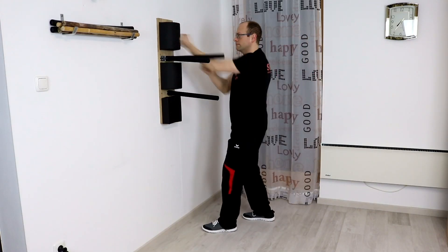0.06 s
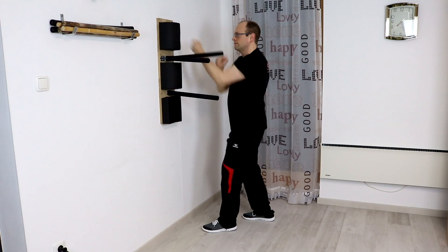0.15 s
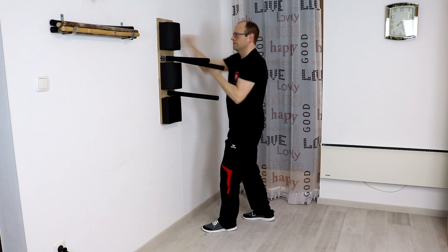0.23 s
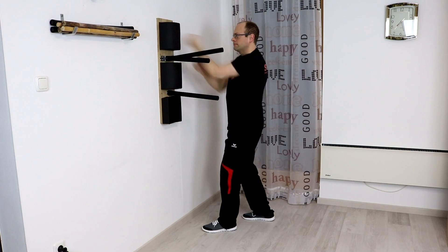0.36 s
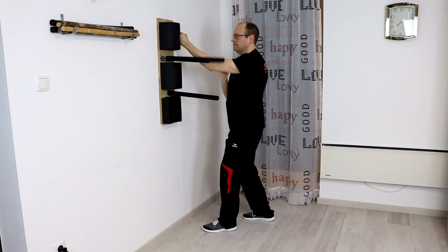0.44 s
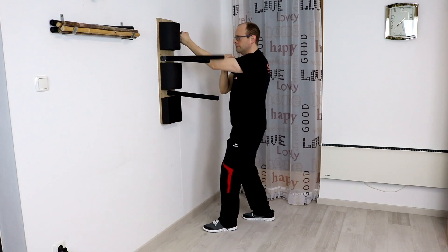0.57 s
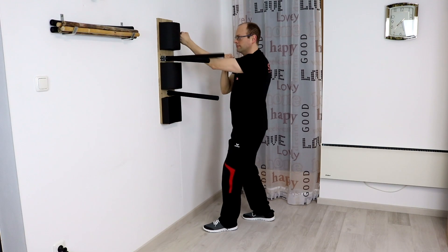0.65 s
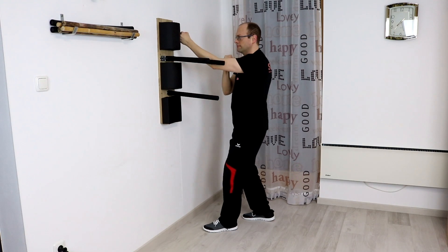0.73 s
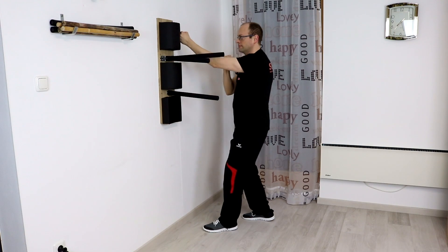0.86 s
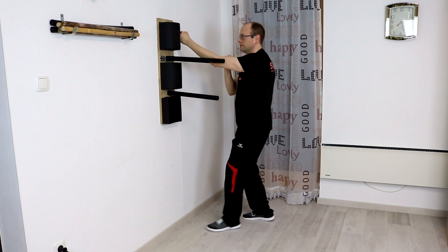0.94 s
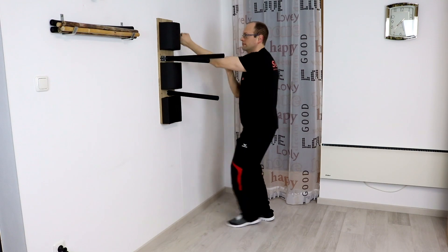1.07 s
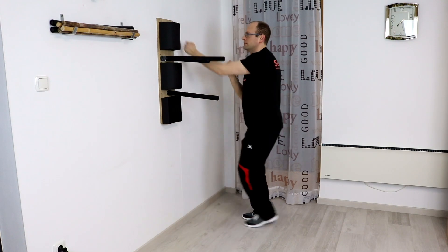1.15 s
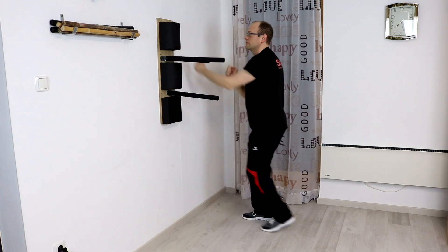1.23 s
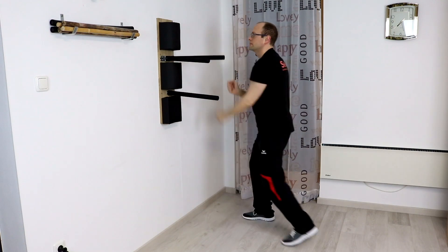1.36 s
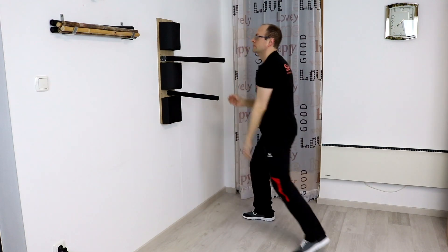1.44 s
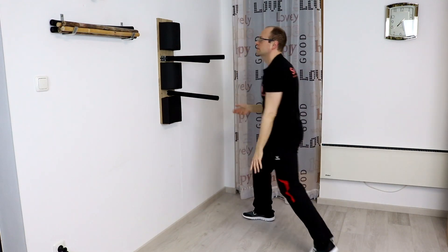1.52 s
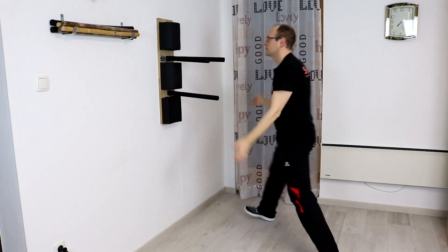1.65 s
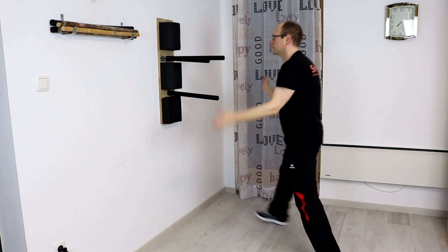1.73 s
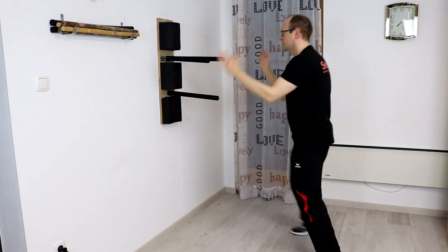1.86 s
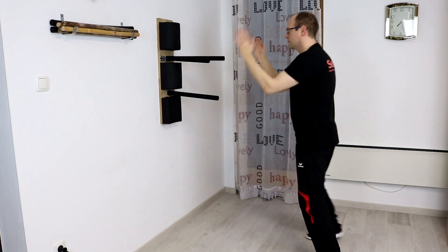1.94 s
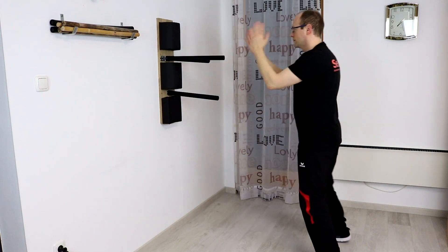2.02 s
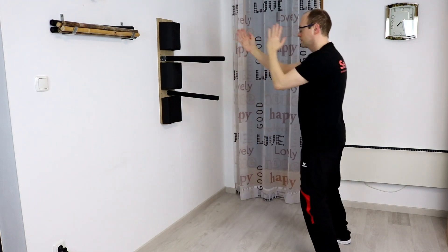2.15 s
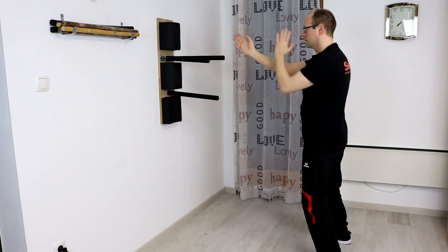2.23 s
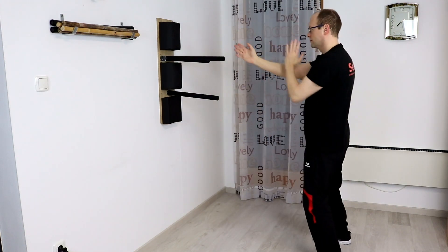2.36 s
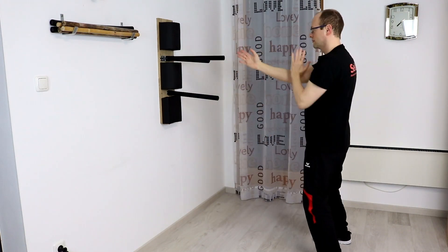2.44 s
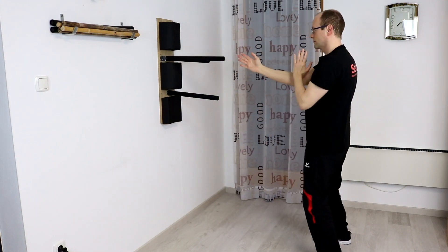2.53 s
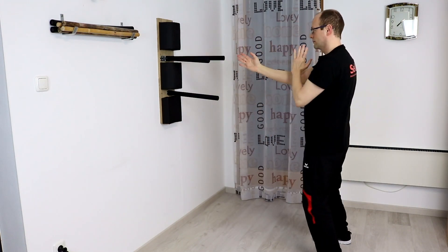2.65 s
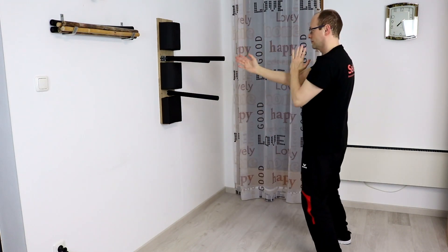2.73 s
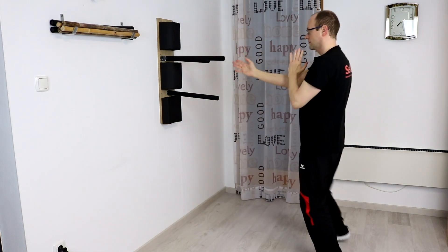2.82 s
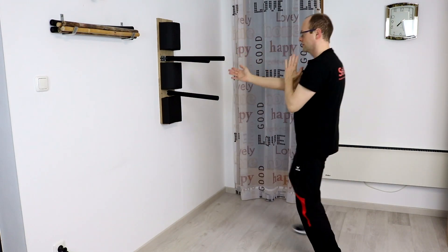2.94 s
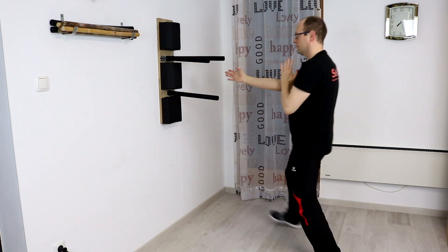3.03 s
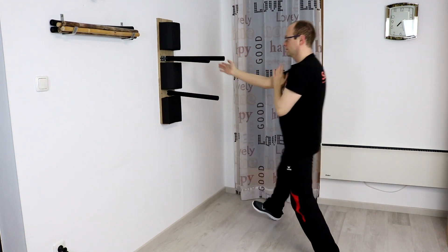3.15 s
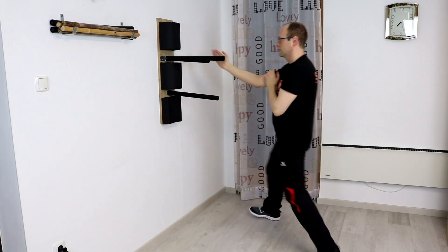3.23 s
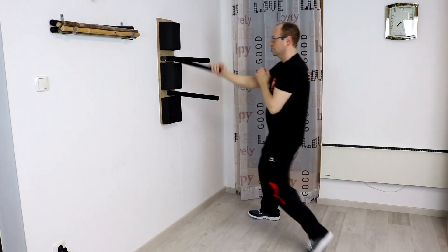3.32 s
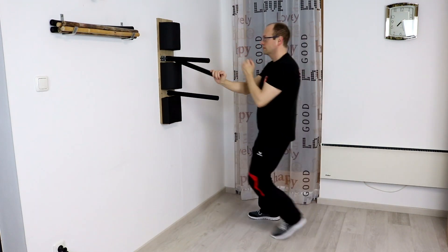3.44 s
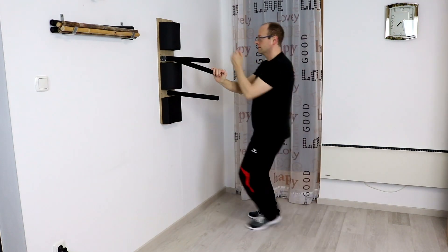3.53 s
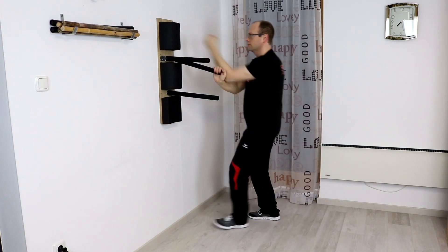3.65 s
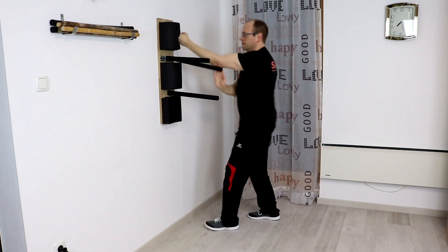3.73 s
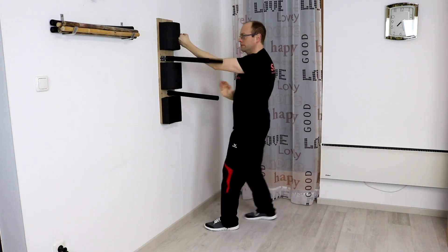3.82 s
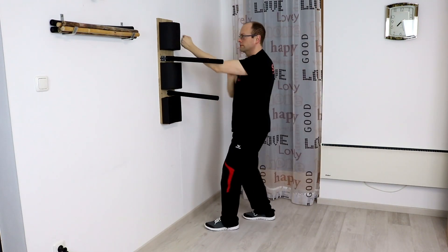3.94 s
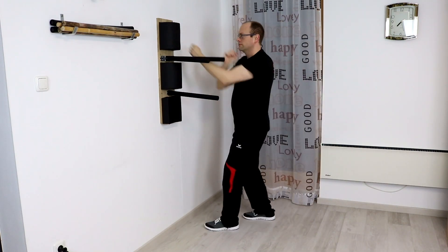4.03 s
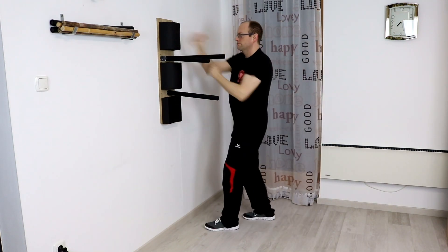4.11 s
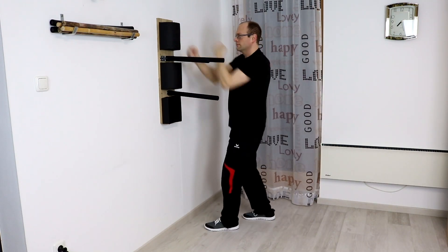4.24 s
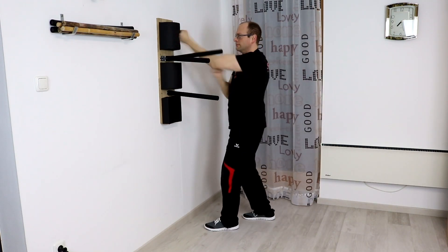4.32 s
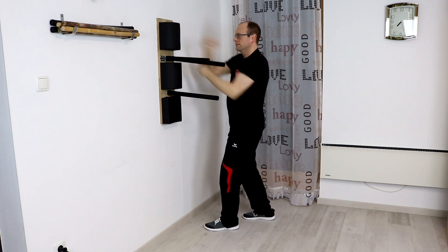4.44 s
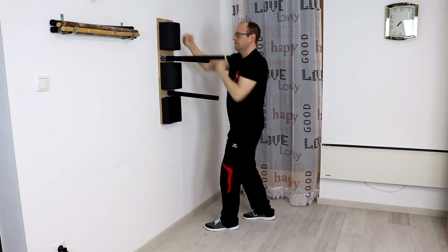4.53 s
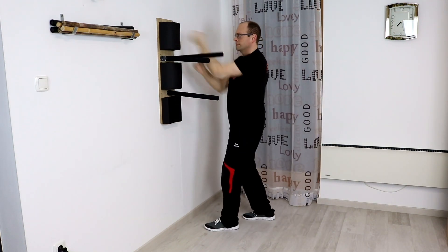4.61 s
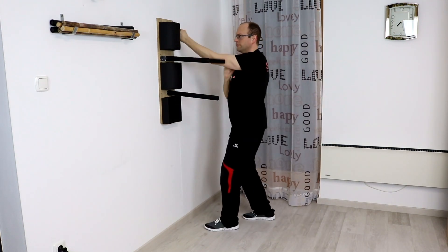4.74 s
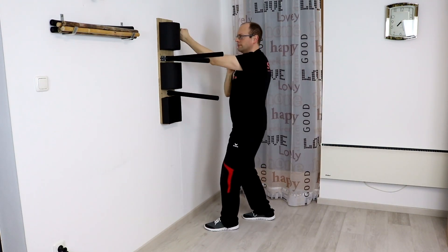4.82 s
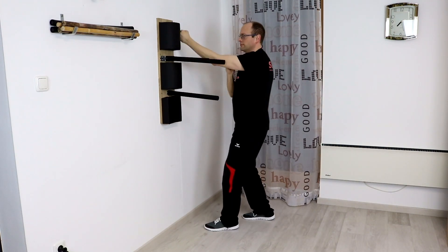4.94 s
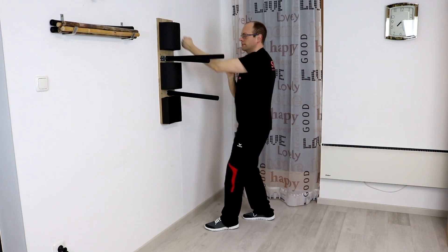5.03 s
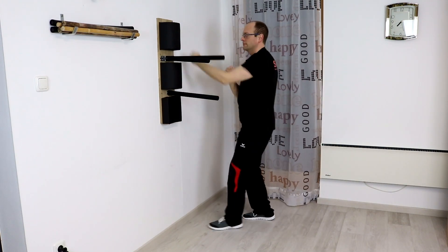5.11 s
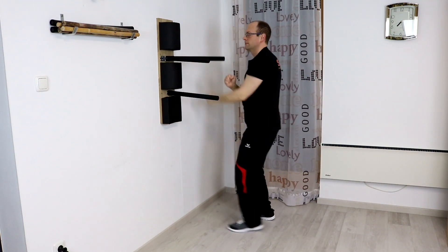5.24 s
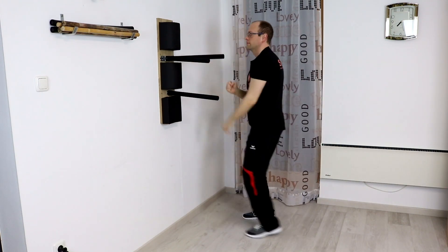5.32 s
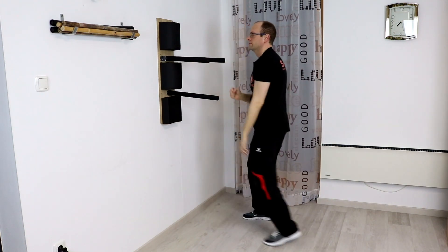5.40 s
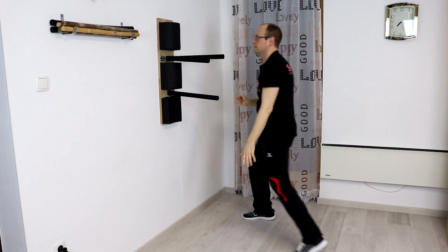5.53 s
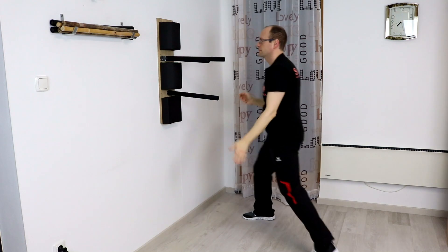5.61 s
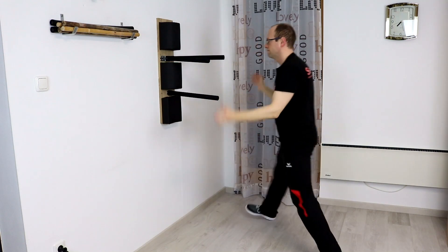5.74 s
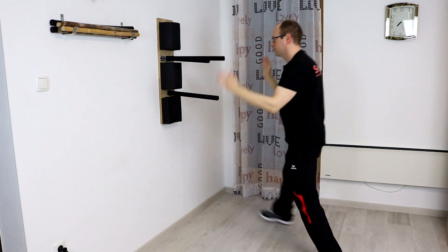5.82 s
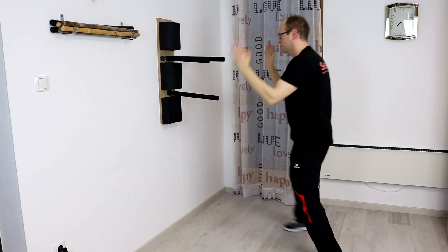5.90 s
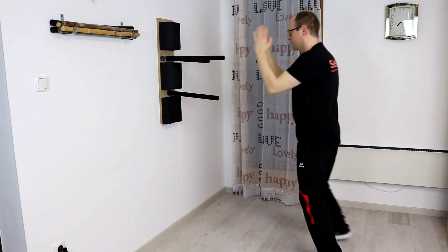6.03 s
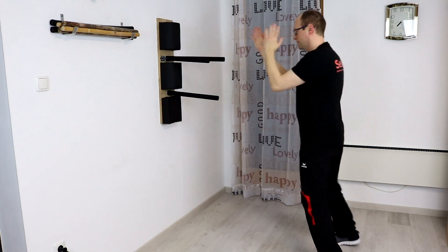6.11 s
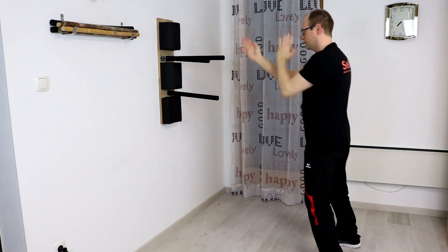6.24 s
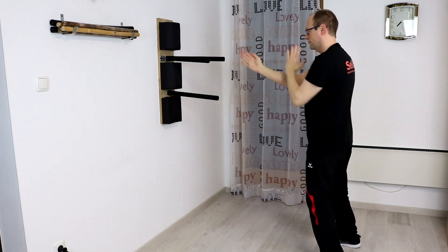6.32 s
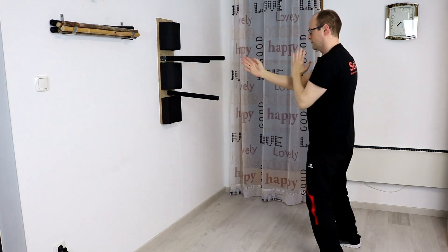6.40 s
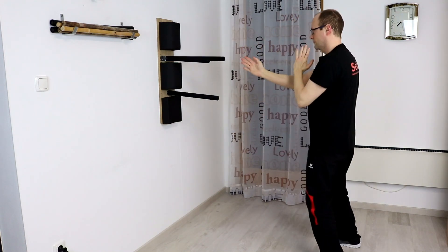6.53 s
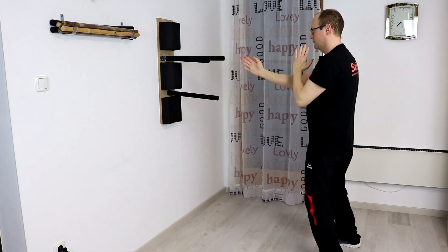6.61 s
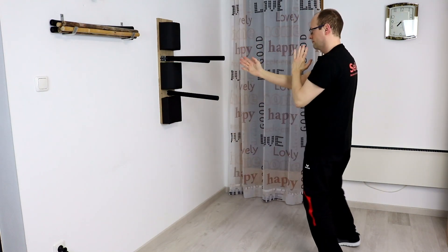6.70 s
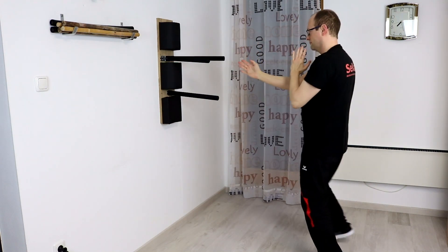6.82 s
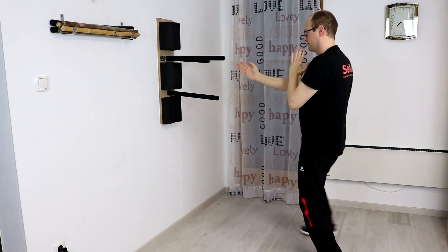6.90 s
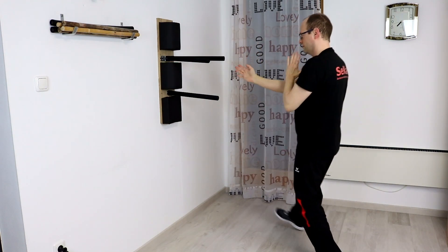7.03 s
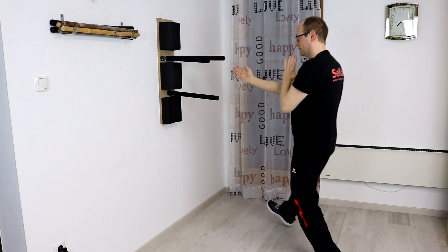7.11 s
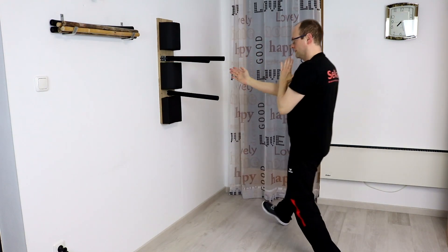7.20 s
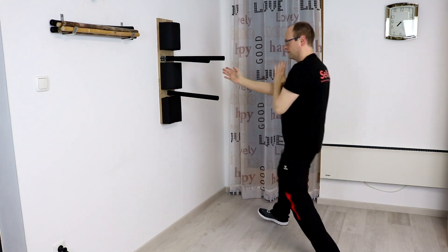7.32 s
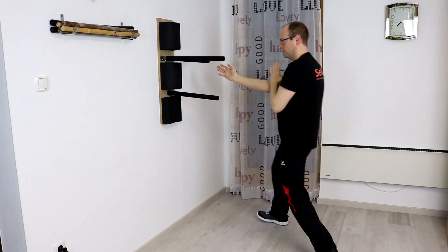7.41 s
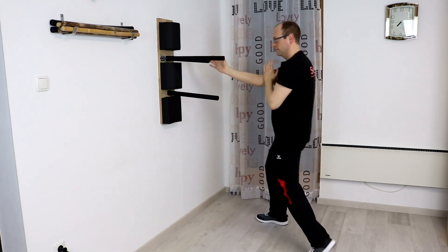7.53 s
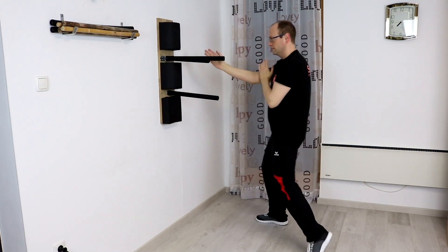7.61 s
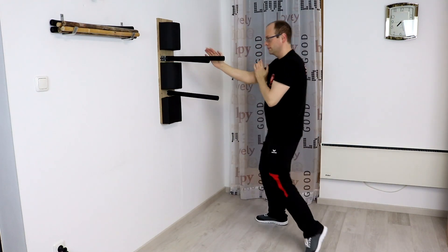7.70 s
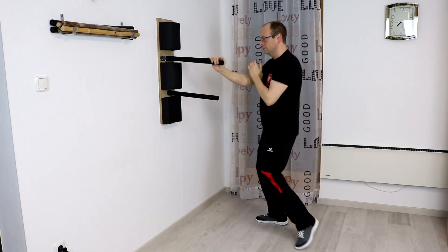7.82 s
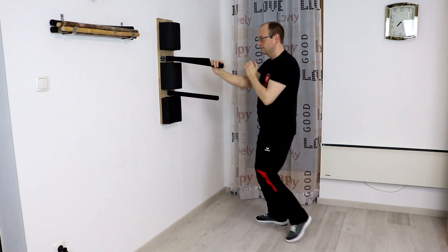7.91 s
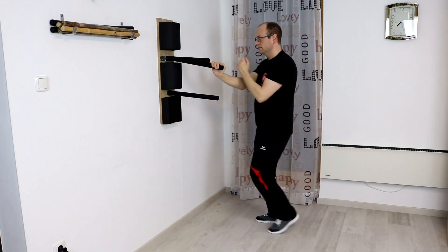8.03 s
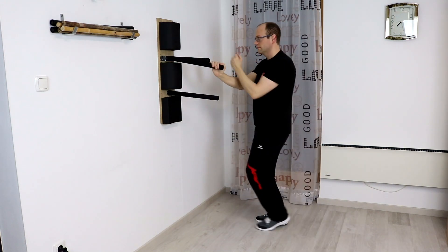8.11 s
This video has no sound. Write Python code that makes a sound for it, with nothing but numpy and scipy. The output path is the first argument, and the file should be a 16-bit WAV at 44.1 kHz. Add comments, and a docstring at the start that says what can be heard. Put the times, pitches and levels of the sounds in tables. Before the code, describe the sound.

Two quick runs of hard fist punches thud and slap on a wall-mounted pad in a boomy bare room, with shoe shuffles, cloth swishes and a hand smack between.

```python
"""Punches on a padded dummy

Runs of punches on a wall-mounted padded training dummy in a small, bare room with a laminate floor.
Each fist is a noise slap on the vinyl over damped ringing of pad and board; decaying noise and sines boom after it.
Shoes tap, slide and squeak, clothes swish, and a hand smacks and rubs the dummy's arm: filtered noise and a chirp.
A mono camera microphone overloads on the hardest blows, over a quiet noise tone; both channels are the same."""
import sys
import numpy as np
from scipy import signal
from scipy.fft import rfft, irfft, next_fast_len
from scipy.io import wavfile
from scipy.ndimage import uniform_filter1d

SR = 44100
rng = np.random.default_rng(int(sys.argv[2]) if len(sys.argv) > 2 else 0)


def wrap_up_sound(samples):
    """Save the sound to the file named by the first command line argument, as 16-bit audio."""
    columns = np.atleast_2d(samples).T
    # keep every value between -1 and 1, then stretch to whole-number steps
    tamed = np.clip(columns, -1, 1)
    steps = np.round(tamed * 32767).astype(np.int16)
    wavfile.write(sys.argv[1], SR, steps)


N = 359856
LEAD = SR // 4  # samples before the start, whose sound rings on into it
TIME = np.arange(-LEAD, N) / SR  # scene clock [s]
AGE = np.arange(SR // 5) / SR  # time since a contact began [s]


# punches on the pad: (time [s], pad level [dB], board level [dB], slap level [dB], slap decay [s],
# cover crinkle level [dB], tuning [ratio], room level [dB])
PUNCHES = [(-.06, -1.5, -9, -5.5, 0.003, -11, 1.12, 0.5), (.094, -6.5, -13, -16.5, 0.024, -25.5, 0.82, -1),
           (0.2713, -13.5, -4.5, -4.5, 0.0019, -19.5, 0.99, 2),
           (0.4018, -5, -11.5, -11.5, 0.012, -18.5, 0.78, 1),
           (3.7286, -3.5, -8.5, -5, 0.0042, -44.5, 0.943, 1),
           (4.1593, -6.5, -11, -4.5, 0.0045, -16, 0.97, 3.5), (4.327, -2, -8, -7, 0.0044, -37, 1, 0.5),
           (4.5083, -7, -3.5, -5, 0.0036, -26, 0.966, -0.5), (4.6613, -5, -11, -16, 0.02, -19.5, 0.91, 0)]
# damped modes of the foam pad: (frequency [Hz], level [dB], t60 [s])
PAD_MODES = [(189.3, -4.5, 0.04), (265, -3, 0.034), (432, -4.5, 0.046)]
# damped modes of the backing board: (frequency [Hz], level [dB], t60 [s])
BACKBOARD_MODES = [(405, -2, 0.025), (492, 2, 0.026), (684, -8.5, 0.019), (870, -19.5, 0.0095),
                   (1278, -8, 0.027), (1610, -24.5, 0.014)]
# spectrum of skin on vinyl: (frequency [Hz], level [dB])
SLAP_SPECTRUM = [(50, -42), (200, -6.5), (600, 12), (1500, 2.5), (3000, -0.5), (4500, 0.5), (8000, 1.5),
                 (11000, -8.5), (16000, -19)]


def punches(bottoming_s=0.00399, rebound_s=0.0102, rebound_db=-2, thump_room_db=-1.0, slap_room_db=2):
    """Knuckles slap the cover, vinyl crinkles as the fist sinks, foam bottoms out and the board knocks back."""
    out = np.zeros(len(TIME))
    click = unit(colour(signal.unit_impulse(len(AGE), idx=64), SLAP_SPECTRUM))
    for s, pad_db, board_db, slap_db, slap_decay, crinkle_db, tuning, room_db in PUNCHES:
        # the board hits the wall a second time, never quite alike
        rebound_tuning = tuning * (1 + 0.093 * rng.standard_normal())
        board = ring(BACKBOARD_MODES, tuning, bottoming_s)
        board = board + undb(rebound_db) * ring(BACKBOARD_MODES, rebound_tuning, rebound_s)
        thump = undb(pad_db) * ring(PAD_MODES, tuning, 0) + undb(board_db) * board

        skin = unit(colour(rng.standard_normal(len(AGE)), SLAP_SPECTRUM)) * np.exp(-AGE / slap_decay)
        # the crinkle swells and fades around 9 ms after contact
        sinking = np.exp(-((AGE - 0.009) / 0.0037) ** 2)
        crinkle = unit(resonate(rng.standard_normal(len(AGE)), 6600, 1600)) * sinking
        cover = undb(slap_db) * thin(skin, hz=132) + undb(crinkle_db) * crinkle

        # summed over all directions, the cover's sound reaches the walls as one smooth click
        spread = click * np.std(cover)
        to_room = undb(thump_room_db) * thump + undb(slap_room_db) * spread
        add(out, s, bounces(thump + cover))
        add(out, s, undb(room_db) * room(to_room))
    return out


def ring(modes, tuning, delay):
    """Damped modes of a struck part, starting after a delay, with the bass thinned."""
    t = np.maximum(AGE - delay, 0)
    modal_sum = sum(undb(db - 60 * t / t60) * np.sin(2 * np.pi * hz * tuning * t) for hz, db, t60 in modes)
    return thin(modal_sum, hz=146, order=5)


def thin(x, hz, order=3):
    """A small surface radiates little bass: a high-pass filter."""
    return signal.sosfilt(signal.butter(order, hz, "high", fs=SR, output="sos"), x)


CATCH_S = 3.2988


def catch(snap_db=-9, snap_hz=6500, width_hz=2800, decay=0.0029, knock_db=-22, room_db=-1):
    """An open hand smacks an arm of the dummy: a bright snap over a dull knock."""
    out = np.zeros(len(TIME))
    snap = undb(snap_db) * resonate(burst(snap_hz, width_hz, decay), snap_hz, 2 * width_hz)
    knock = undb(knock_db) * burst(1070, 2100, 0.018)
    # the room hears the snap as one smooth click of equal strength
    click = resonate(signal.unit_impulse(len(AGE)), snap_hz, width_hz)
    click = resonate(click, snap_hz, 2 * width_hz)
    to_room = unit(click) * np.std(snap) + knock
    add(out, CATCH_S, bounces(snap + knock))
    add(out, CATCH_S, undb(room_db) * room(to_room, standing_db=-71))
    return out


# shoes landing on the floor: (time [s], tap level [dB], centre [Hz], width [Hz], decay [s], floor thud level [dB])
STEPS = [(1.667, -27.5, 2850, 8400, 0.04, -60), (1.679, -22.5, 1710, 1580, .019, -59),
         (1.791, -27, 930, 900, 0.015, -57), (1.814, -16.5, 660, 300, 0.017, -42),
         (3.189, -19, 603, 380, 0.012, -40), (3.469, -25.5, 1680, 700, 0.014, -57),
         (3.498, -23, 1660, 800, 0.023, -73), (3.576, -24.5, 600, 350, .008, -50),
         (5.722, -24.5, 3900, 9150, 0.022, -58), (5.748, -20.5, 2060, 2090, 0.026, -60),
         (5.955, -25.5, 590, 341, 0.074, -46), (7.23, -28, 543, 500, 0.007, -47.5),
         (7.499, -42.5, 600, 400, 0.007, -70), (7.953, -35, 527, 250, 0.014, -64)]


def steps(thud_hz=115, thud_width_hz=90, thud_decay=0.029):
    """Heel or toe taps the laminate, with a soft thud of the floor beneath."""
    out = np.zeros(len(TIME))
    for s, tap_db, hz, width_hz, decay, thud_db in STEPS:
        tap = resonate(burst(hz, width_hz, decay), hz, 2 * width_hz)
        # the rubber sole rounds the attack
        tap = resonate(tap, hz, 3 * width_hz)
        thud = resonate(burst(thud_hz, thud_width_hz, thud_decay), thud_hz, thud_width_hz)
        add(out, s, undb(tap_db) * tap + undb(thud_db) * thud)
    return out


def burst(hz, width_hz, decay):
    """A short contact noise that dies away in one resonance."""
    noise = resonate(rng.standard_normal(len(AGE)), hz, width_hz)
    return unit(noise) * np.exp(-AGE / decay)


SQUEAK_S = 1.800


def squeak(db=-17, pitch_hz=985, half_s=0.0079, octave_db=-5.0, waver=0.037):
    """A rubber sole catches on the laminate: a brief chirp of wavering pitch with its octave."""
    phase = 2 * np.pi * np.cumsum(pitch_hz * (1 + waver * walk(400))) / SR
    swell = np.exp(-((TIME - SQUEAK_S) / half_s) ** 4)
    return undb(db) * swell * (np.sin(phase) + undb(octave_db) * np.sin(2 * phase))


PRESSURE_DB = 0.2  # wander of the foot's weight
SLIDE_RELEASE_S, SWISH_RELEASE_S = 0.025, 0.04
# shoes sliding over the floor: (time [s], speeding up [s], gliding [s], sole rubbing level [dB],
# grit scraping level [dB])
SLIDES = [(.92, 0.057, .06, -54, -36), (1.011, 0.063, 0.024, -32.5, -28.5), (1.26, 0.049, 0.026, -31, -44),
          (1.35, 0.015, 0.068, -30.5, -46.5), (1.49, 0.01, 0.008, -36, -45),
          (1.787, 0.0061, 0.035, -33, -29), (1.826, .018, 0.043, -46, -20),
          (1.88, 0.024, 0.059, -35.5, -29.5), (2.0, 0.019, 0.026, -54, -27.5),
          (2.77, 0.022, 0.052, -54, -57.5), (2.85, .045, 0.014, -49.5, -48),
          (2.95, 0.036, 0.39, -55.5, -52.5), (3.465, 0.023, 0.047, -34.5, -35),
          (5.1, 0.067, 0.096, -41.5, -36.5), (5.245, 0.037, 0.03, -28, -33),
          (5.31, 0.0093, 0.082, -23.5, -32), (5.405, .018, 0.013, -26, -43),
          (5.475, 0.028, 0.026, -29.5, -53), (5.57, 0.045, 0.064, -37, -47), (5.951, 0.034, 0.17, -33, -34),
          (6.107, 0.027, 0.0036, -31, -29), (6.68, 0.036, 0.23, -59.5, -55),
          (7.02, 0.037, 0.24, -55, -56.5), (7.279, 0.017, 0.2, -60, -51), (7.53, 0.025, 0.29, -77, -52),
          (7.79, .04, 0.096, -49, -65), (7.94, 0.018, 0.013, -50, -58)]
# floorboard resonances rubbed by the sole: (frequency [Hz], width [Hz], level [dB])
FLOORBOARDS = [(329.5, 38, -4), (596, 193, 3.5), (802, 377, 6), (1114, 295, 2), (1775, 550, -5.5)]
# spectrum of grit under the sole: (frequency [Hz], level [dB])
GRIT_SPECTRUM = [(200, -34), (450, -3.5), (1200, 2), (1900, 5), (3200, 5), (5000, 3), (9000, -9.5),
                 (16000, -39)]


def slides(rub_rough_db=2.5, grit_rough_db=2.0):
    """Soles drag over the boards, stirring their resonances, and grit scrapes under them."""
    rub = strokes([(s, rise, hold, db) for s, rise, hold, db, _ in SLIDES], SLIDE_RELEASE_S)
    scrape = strokes([(s, rise, hold, db) for s, rise, hold, _, db in SLIDES], SLIDE_RELEASE_S)

    # as the shoe travels, the same rubbing power favours now one resonance of the floor, now another
    shares = np.array([undb(db + 3.5 * walk(22)) for _, _, db in FLOORBOARDS])
    shares = shares / np.linalg.norm(shares, axis=0)
    slips = friction(rub_rough_db)
    sole = 0
    for share, (hz, width_hz, _) in zip(shares, FLOORBOARDS):
        board = resonate(resonate(slips, hz, width_hz), hz, 2 * width_hz)
        sole = sole + share * unit(board)

    grit = unit(colour(friction(grit_rough_db), GRIT_SPECTRUM))
    # the weight on the foot is never steady
    pressure = undb(PRESSURE_DB * walk(30))
    return pressure * (rub * sole + scrape * grit)


# trouser legs and sleeves swinging: (time [s], speeding up [s], gliding [s], level [dB])
SWISHES = [(.045, 0.017, .005, -31.5), (.51, 0.09, 0.023, -50), (0.898, 0.056, 0.081, -38),
           (1.02, 0.039, 0.21, -31), (1.305, 0.023, 0.07, -31), (1.468, 0.0083, 0.11, -35),
           (1.788, 0.029, 0.11, -26), (1.92, 0.039, 0.045, -28.5), (2.87, 0.041, .004, -43.5),
           (3.16, 0.1, 0.044, -40), (3.25, 0.079, .02, -35), (3.465, .035, 0.05, -37),
           (3.67, 0.033, .01, -43), (3.83, 0.031, 0.0093, -27.5), (3.99, 0.022, .005, -46),
           (4.11, 0.02, .005, -44.5), (4.695, 0.016, .005, -34), (5.059, 0.064, 0.16, -38),
           (5.304, 0.018, 0.13, -34), (5.42, 0.021, 0.22, -31.5), (5.951, 0.015, 0.15, -29),
           (6.8, 0.045, .003, -42), (7.02, 0.047, .02, -55), (7.28, 0.11, 0.027, -47.5),
           (7.53, 0.027, 0.2, -49)]
# spectrum of brushing cloth: (frequency [Hz], level [dB])
CLOTH_SPECTRUM = [(150, -27), (320, 0.5), (1000, 1.5), (2500, -2), (4500, 0), (8200, 1), (11000, -5),
                  (14000, -13.5), (16000, -18)]


def clothes(rough_db=0.92):
    """Cloth brushes on cloth with every swing of a leg or an arm."""
    return strokes(SWISHES, SWISH_RELEASE_S) * unit(colour(friction(rough_db), CLOTH_SPECTRUM))


# a palm sliding along a padded arm of the dummy: (time [s], speeding up [s], gliding [s], level [dB])
ARM_RUBS = [(7.67, .12, 0.29, -42.5), (7.935, 0.051, 0.11, -34.5)]
# spectrum of skin rubbing on the arm's cover: (frequency [Hz], level [dB])
ARM_COVER_SPECTRUM = [(120, -28), (250, -2), (600, 0.5), (950, -6), (1700, 4), (2600, -2.5), (5000, 0),
                      (8500, 0.5), (12000, -3.5), (16000, -14)]


def arm_rub(rough_db=0.9):
    """The hand follows the arm of the dummy with a fine, bright hiss."""
    return strokes(ARM_RUBS, SWISH_RELEASE_S) * unit(colour(friction(rough_db), ARM_COVER_SPECTRUM))


def friction(rough_db):
    """Dense micro-slips: noise whose strength comes and goes."""
    return rng.standard_normal(len(TIME)) * undb(rough_db * (walk(400) + 0.7 * walk(45)))


SAG_DB_PER_S = 8.5  # every stroke slows a little as it glides


def strokes(rows, release, size=32):
    """Gain of strokes that gather speed, sag while gliding and die away; overlaps add in power."""
    t, power = TIME[::size], 0  # one gain value every few samples, joined by lines
    for s, rise, hold, db in rows:
        age = np.maximum(t - s, 0)
        attack = np.sin(np.pi / 2 * np.minimum(age / rise, 1)) ** 2
        glide = undb(db - SAG_DB_PER_S * np.maximum(age - rise, 0))
        stop = np.exp(-np.maximum(age - rise - hold, 0) / release)
        power = power + (attack * glide * stop) ** 2
    return np.interp(TIME, t, np.sqrt(power))


# first bounces off the floor and the near walls: (delay [s], level [dB])
BOUNCES = [(.0021, -27.5), (.0074, -16), (0.0128, -13)]


def bounces(x):
    """The direct sound and its first reflections, as delayed copies."""
    t = np.arange(len(x)) / SR
    out = x
    for delay, db in BOUNCES:
        whole_delay = round(delay * SR) / SR
        out = out + undb(db) * np.interp(t - whole_delay, t, x, left=0)
    return out


# the room's diffuse ring: (band centre [Hz], level [dB], t60 [s], build-up [s])
DIFFUSE_BANDS = [(60, -20.5, 0.32, .02), (120, -13.5, 0.94, .02), (163.3, 4.5, 1, 0.017),
                 (245, 4, 0.94, 0.025), (324, 5, 0.59, 0.059), (403, 6, 0.59, 0.032),
                 (662, -1, 0.59, 0.037), (1800, -3.5, 0.62, 0.023), (4150, -1.5, 0.57, 0.024),
                 (7500, -5, 0.5, 0.041), (15000, -6, 0.36, 0.015)]
# standing waves between the walls: (frequency [Hz], t60 [s])
STANDING_WAVES = [(189.5, .95), (219, 1.0), (260.3, .8), (348, .75), (364, .65), (420, .65), (493, .6)]
# strength of each standing wave, in the same order: (level [dB])
STANDING_LEVELS = [-0.5, 0, 8, -2, 4.5, 5, -13]


def room(x, diffuse_db=-34, standing_db=-57, boom_build_s=0.069):
    """Bare walls: a diffuse noise tail, each band with its own fade, and slowly building standing waves."""
    t = np.arange(SR) / SR
    log_f = np.log(np.maximum(np.fft.rfftfreq(len(t), 1 / SR), 1))
    noise = rfft(rng.standard_normal(len(t)))
    log_centres = np.log(np.array(DIFFUSE_BANDS)[:, 0])
    tail = 0
    # each row of the identity matrix picks one band, cross-faded into its neighbours
    for pick, (_, db, t60, build) in zip(np.eye(len(DIFFUSE_BANDS)), DIFFUSE_BANDS):
        band = irfft(noise * np.interp(log_f, log_centres, pick), len(t))
        tail = tail + band * undb(db - 60 * t / t60) * (1 - np.exp(-(t / build) ** 2))
    boom = 0
    for (hz, t60), db in zip(STANDING_WAVES, STANDING_LEVELS):
        boom = boom + np.sin(2 * np.pi * hz * t) * undb(db - 60 * t / t60)
    boom = boom * (1 - np.exp(-(t / boom_build_s) ** 2))
    return signal.fftconvolve(x, undb(diffuse_db) * tail + undb(standing_db) * boom)


def moving_room(x, count=4, turns_hz=10):
    """A moving body keeps changing its paths to the walls, and barely stirs the standing waves."""
    out = 0
    # the sound is handed round a few different room tails
    for k in range(count):
        share = np.maximum(np.cos(2 * np.pi * (turns_hz * TIME - k / count)), 0)
        out = out + room(share * x, standing_db=-77)[:len(x)]
    return out


# spectrum of the quiet room tone: (frequency [Hz], level [dB])
TONE_SPECTRUM = [(18, -46), (30, -7), (59, -10), (90, -3), (124, -7), (336, -5), (760, -12), (1100, -8.5),
                 (8740, -15.5), (14400, -20), (16000, -18.5)]


def room_tone(db=-55.5):
    """Steady, quiet coloured noise behind everything."""
    return undb(db) * unit(colour(rng.standard_normal(len(TIME)), TONE_SPECTRUM))


def undb(db):
    """Decibels to gain."""
    return 10 ** (np.asarray(db) / 20)


def unit(x):
    """Scale to rms 1."""
    return x / np.sqrt(np.mean(x ** 2))


def colour(x, points):
    """Filter by a spectrum of (frequency [Hz], level [dB]) points, joined on a log frequency axis."""
    hz, db = np.transpose(points)
    size = next_fast_len(len(x))
    f = np.maximum(np.fft.rfftfreq(size, 1 / SR), 1)
    gain = undb(np.interp(np.log(f), np.log(hz), db))
    return irfft(rfft(x, size) * gain, size)[:len(x)]


def resonate(x, hz, width_hz):
    """One resonance, gain 1 at its centre."""
    b, a = signal.iirpeak(min(hz, 0.45 * SR), hz / min(width_hz, SR / 4), SR)
    return signal.lfilter(b, a, x)


def walk(rate):
    """Random wander: straight lines between normal random knots, rate knots a second."""
    knots = np.arange(TIME[0], TIME[-1] + 1, 1 / rate)
    return np.interp(TIME, knots, rng.standard_normal(len(knots)))


def add(track, s, sound):
    """Mix a sound into a track at time s."""
    i = max(LEAD + int(s * SR), 0)
    part = sound[:max(len(track) - i, 0)]
    track[i:i + len(part)] += part


def scene(body_room_db=-0.5):
    """Blows and footwork in the room, the same in both channels."""
    blows = punches() + catch()
    body = steps() + squeak() + slides() + clothes() + arm_rub()
    body_in_room = bounces(body) + undb(body_room_db) * moving_room(body)
    mono = blows + body_in_room + room_tone()
    return np.tile(mono[LEAD:], (2, 1))


TOP_HZ = 15900


def record(dry):
    """The microphone flattens the hardest peaks; the top is cut."""
    clipped = dry / (1 + dry ** 6) ** (1 / 6)
    return signal.sosfilt(signal.ellip(8, 0.2, 70, TOP_HZ, fs=SR, output="sos"), clipped)


dry = scene()
out = record(dry)
wrap_up_sound(out)
```